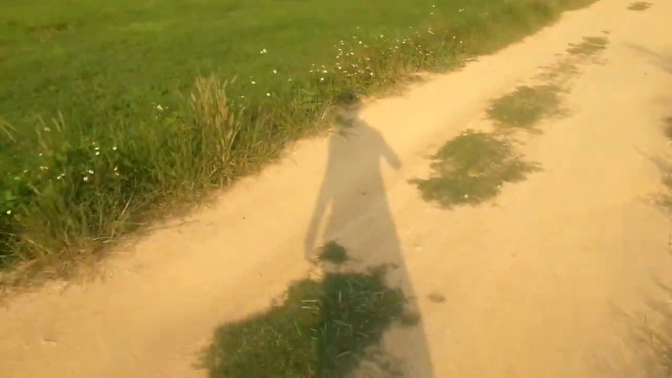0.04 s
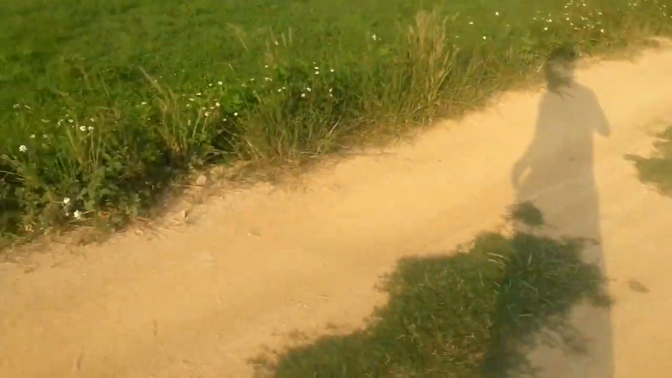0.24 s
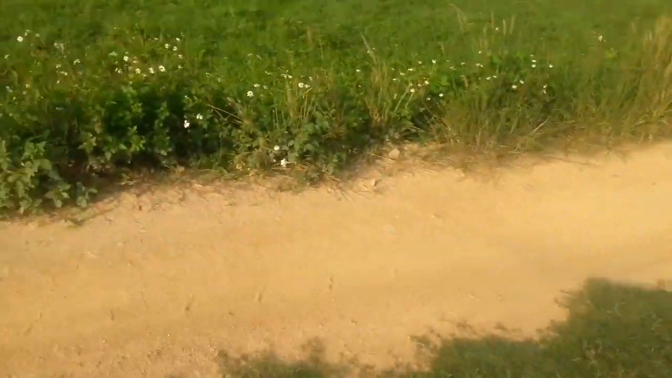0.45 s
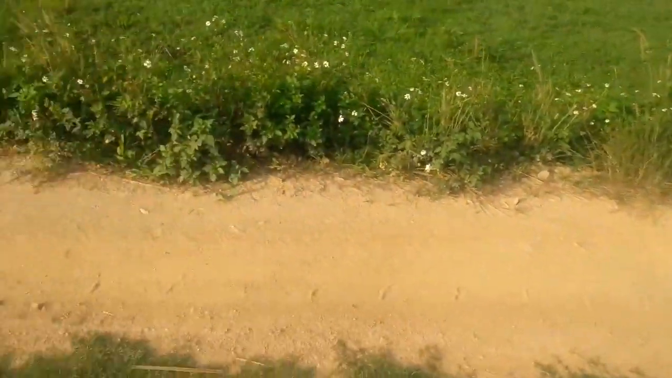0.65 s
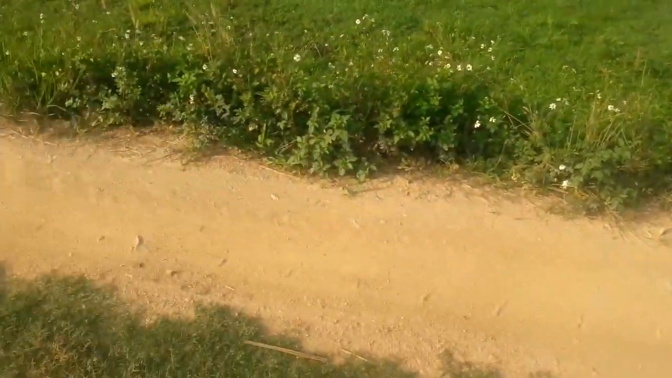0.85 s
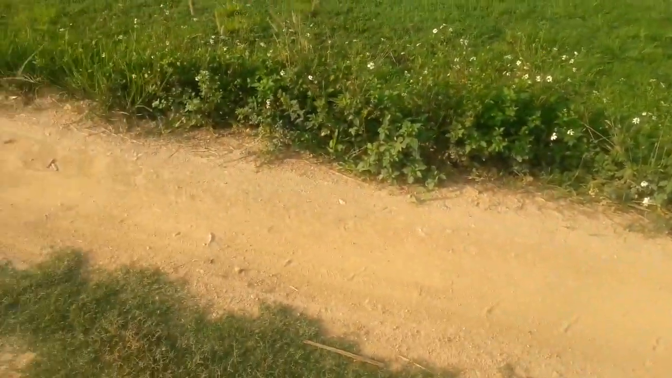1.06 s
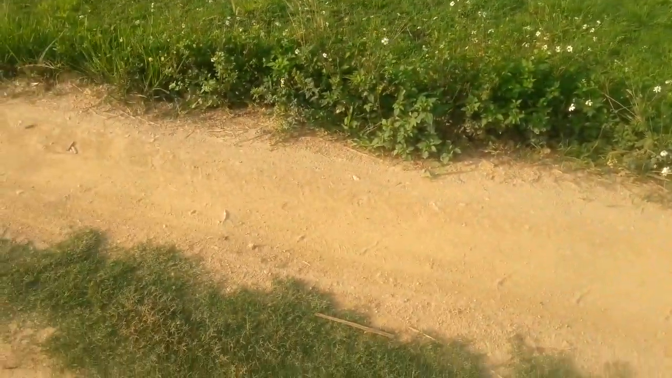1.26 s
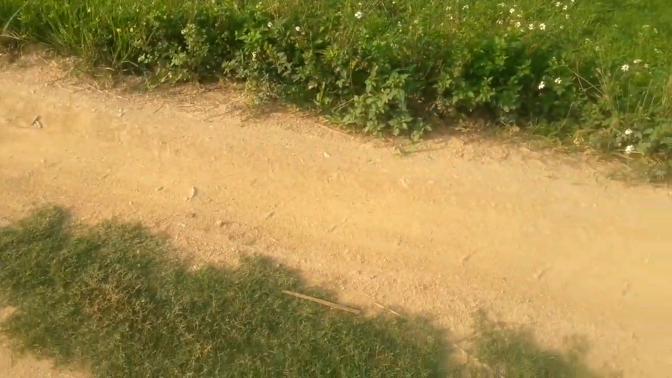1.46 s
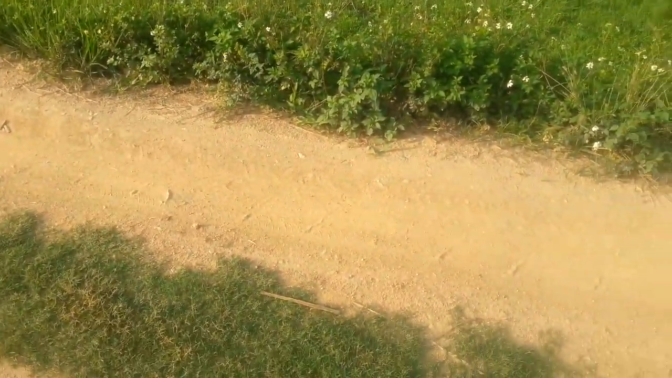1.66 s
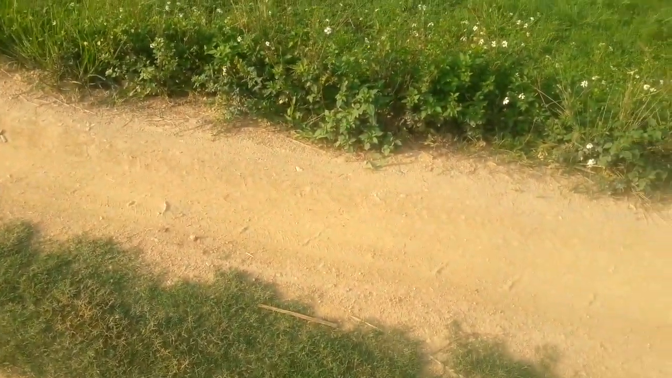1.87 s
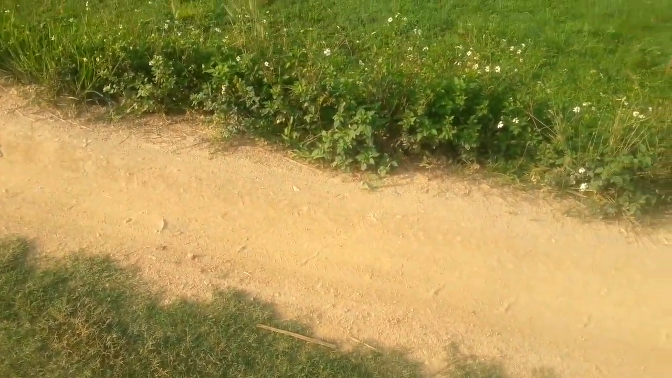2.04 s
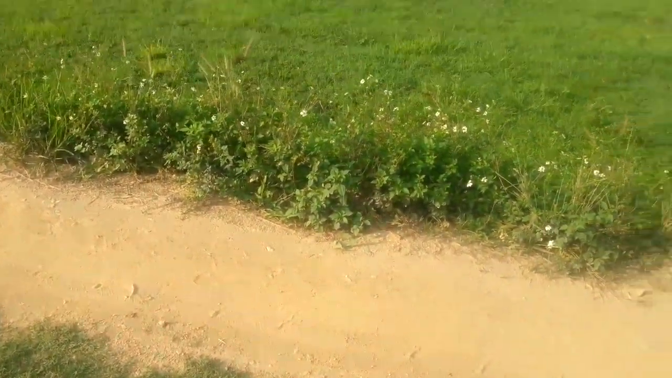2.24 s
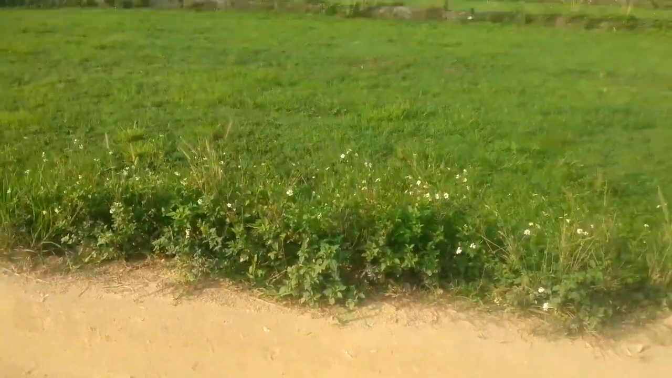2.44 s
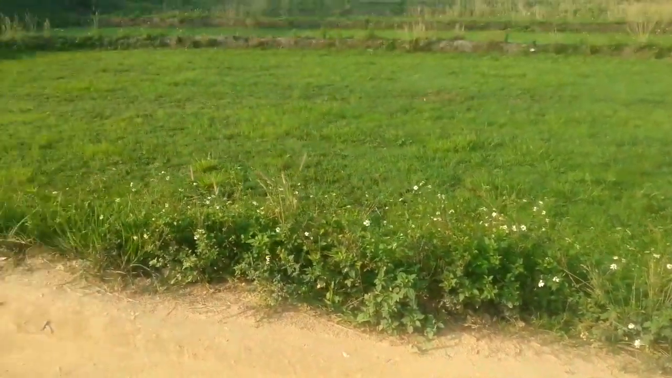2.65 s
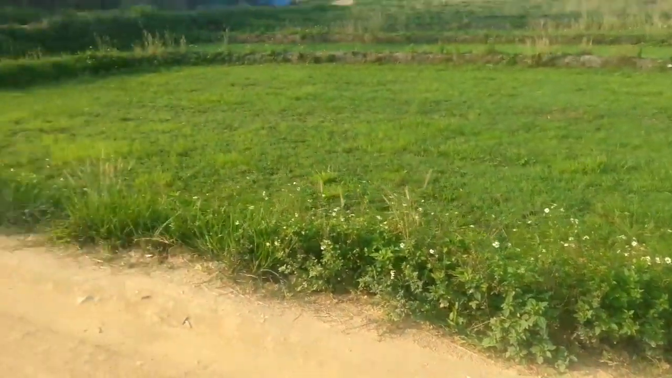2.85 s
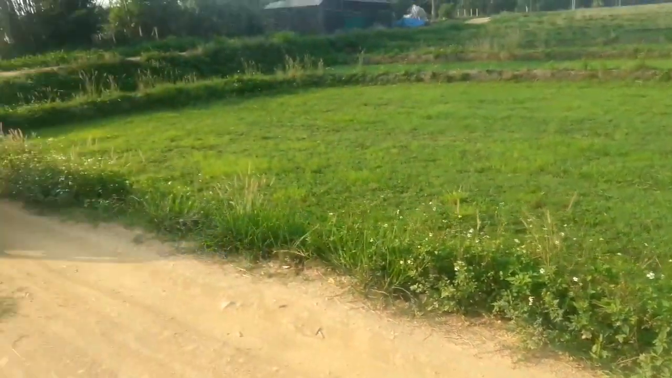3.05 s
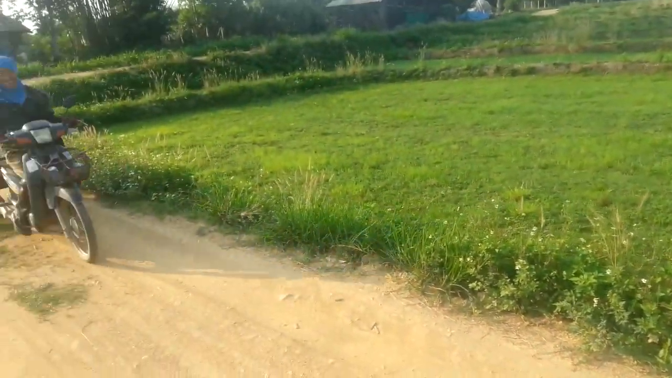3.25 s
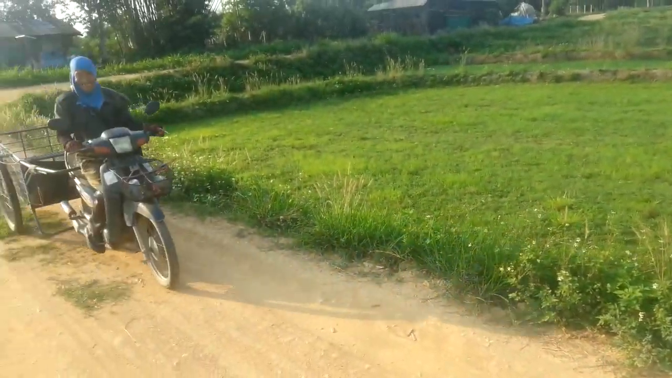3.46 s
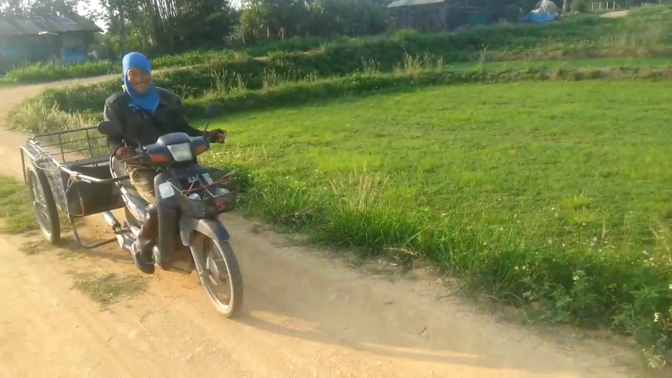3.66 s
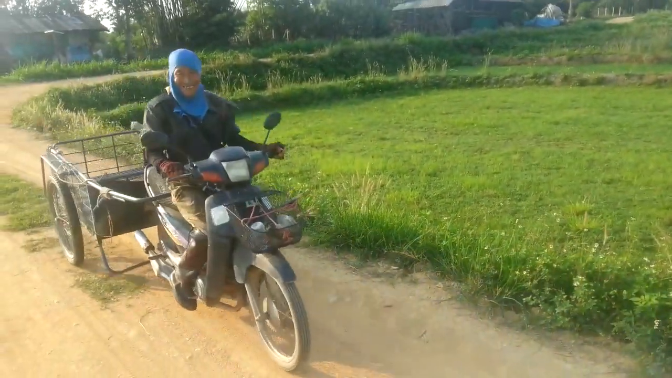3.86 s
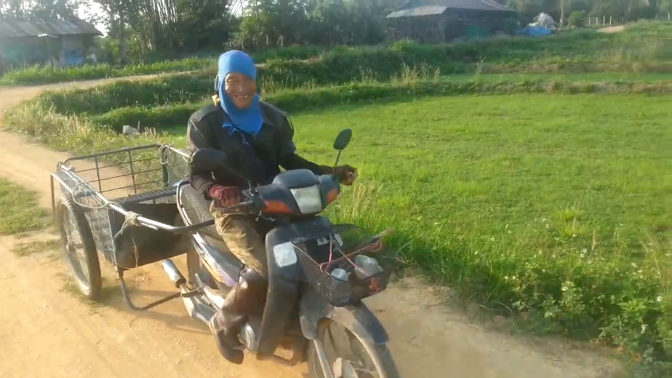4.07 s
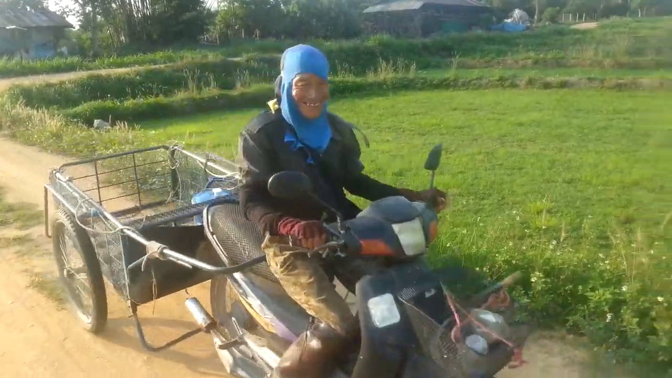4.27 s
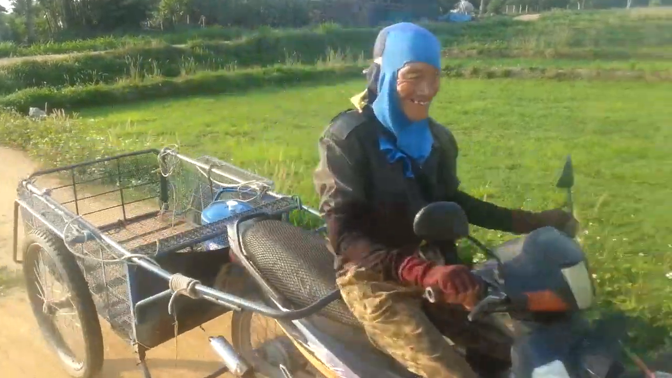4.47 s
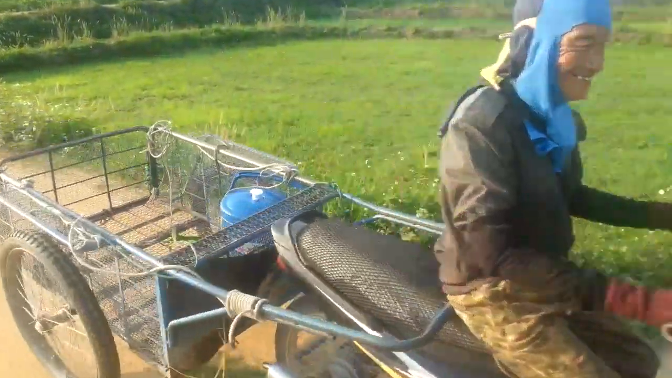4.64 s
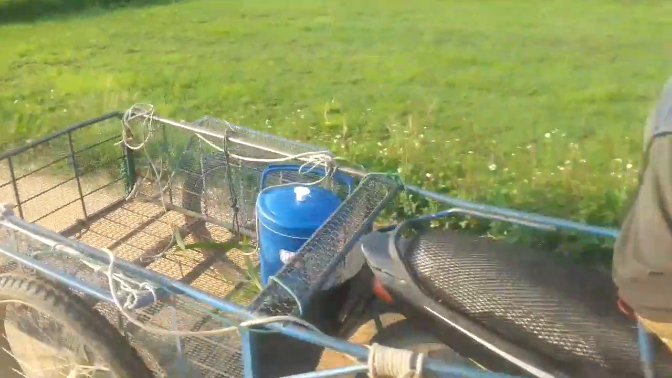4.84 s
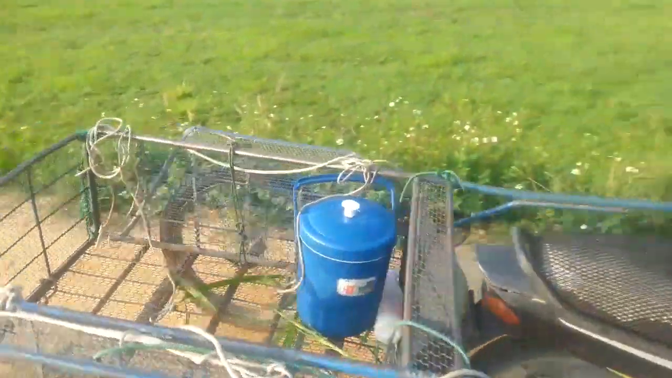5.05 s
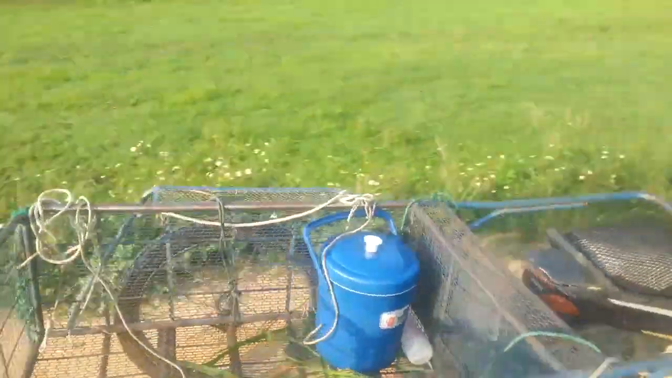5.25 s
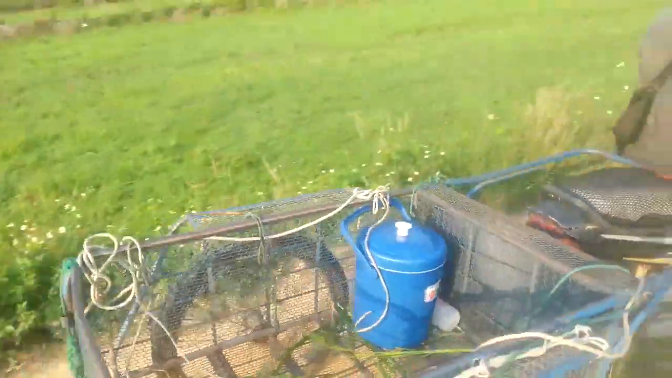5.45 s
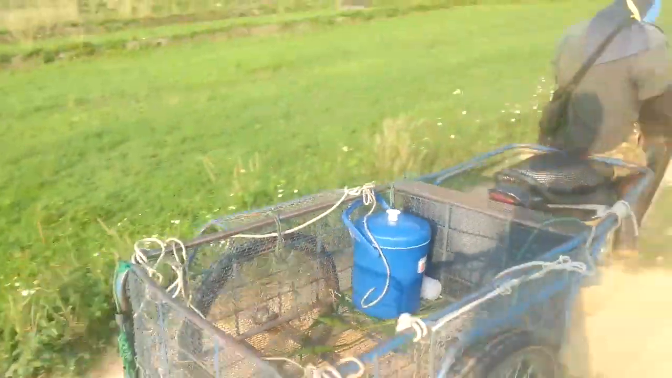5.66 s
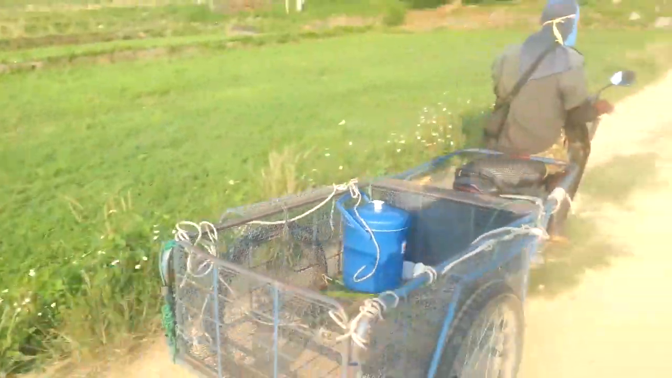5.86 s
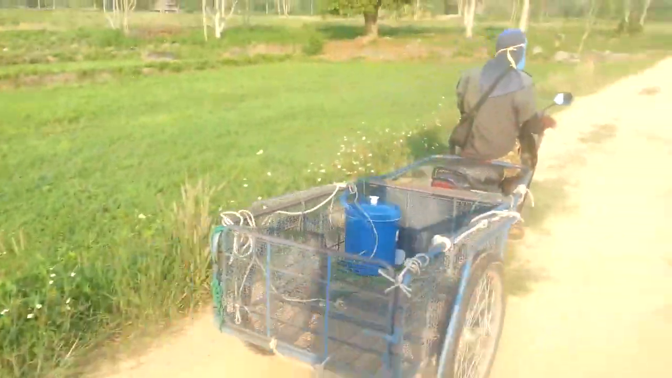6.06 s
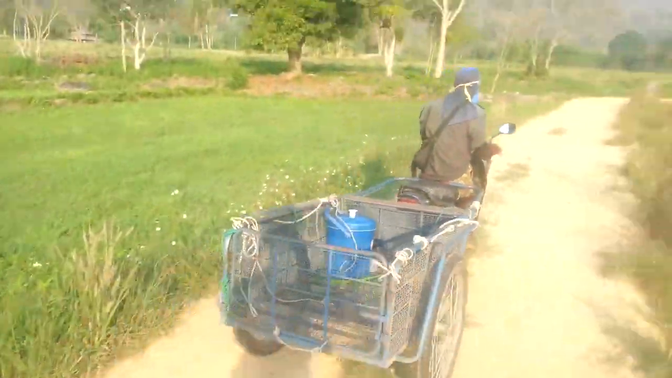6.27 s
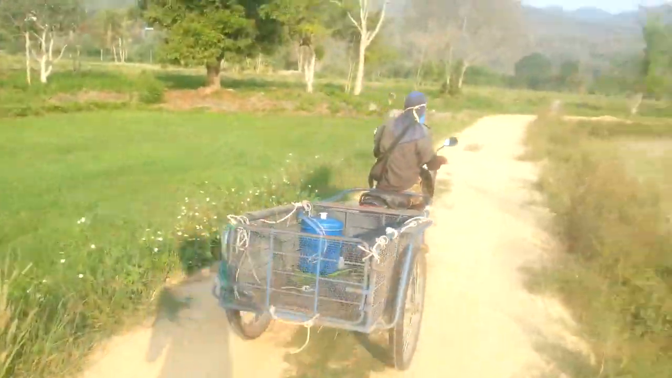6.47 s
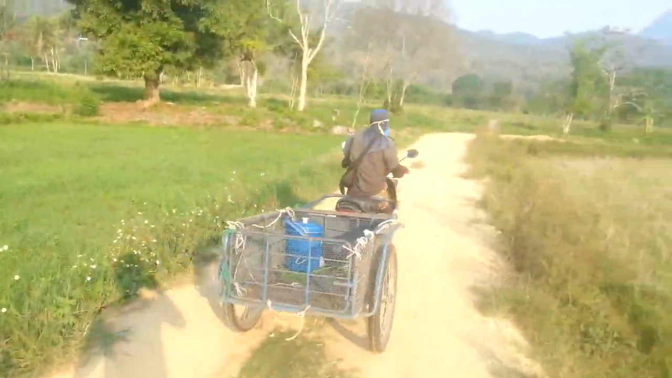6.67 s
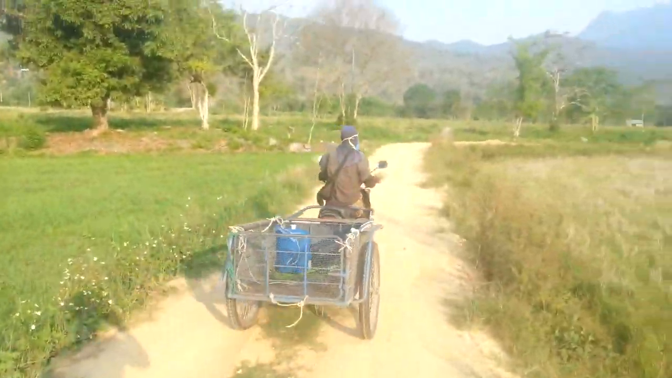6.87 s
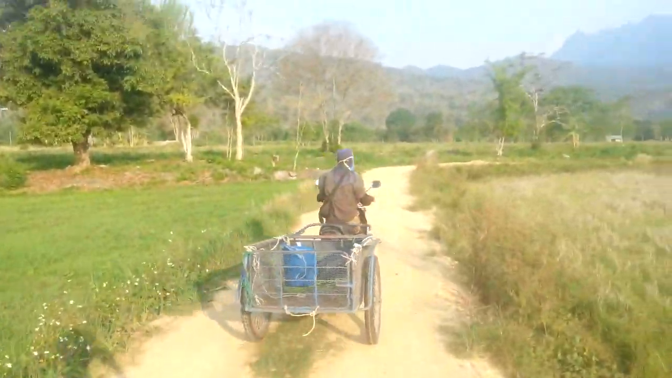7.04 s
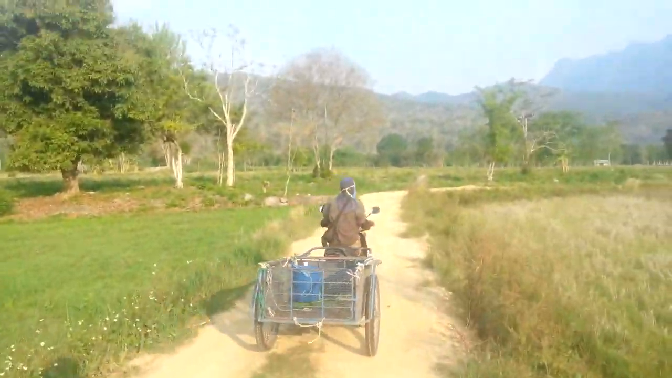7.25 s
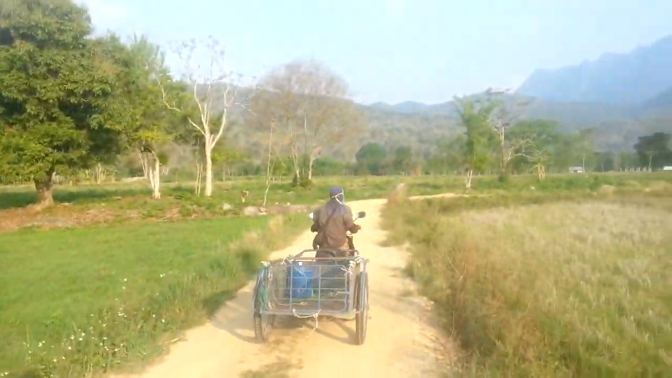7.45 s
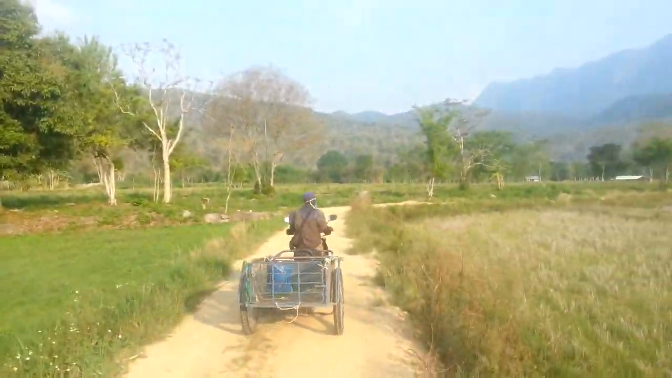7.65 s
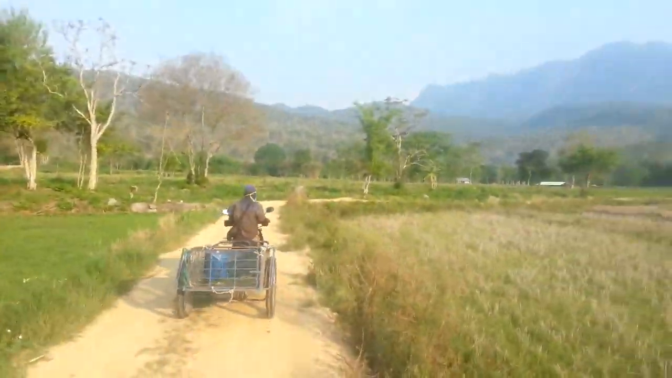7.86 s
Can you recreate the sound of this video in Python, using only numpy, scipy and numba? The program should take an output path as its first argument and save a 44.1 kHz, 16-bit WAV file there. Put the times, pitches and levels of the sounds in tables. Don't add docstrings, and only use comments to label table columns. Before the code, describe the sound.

A phone held beside a rural track picks up a faint, stuttering motorbike and a few soft foot scuffs over grassy hiss. The bike opens its throttle and comes close, sharp dry exhaust cracks over hollow pipe puffs. Its empty wire cart follows with hard metallic jolts, loose rattling and crunching tyres. Then the engine, slightly faster, moves off, still popping, with scattered cart bangs. Little bass, open air, no echo.

```python
import sys
import numpy as np
from scipy import signal
from scipy.fft import rfft, irfft
from scipy.io import wavfile
from scipy.ndimage import uniform_filter1d
from numba import njit

SR = 44100
rng = np.random.default_rng(int(sys.argv[2]) if len(sys.argv) > 2 else 0)


def store_wav(level_fs):
    pcm = np.round(np.clip(np.atleast_2d(level_fs), -1, 1) * 32767)
    wavfile.write(sys.argv[1], SR, pcm.T.astype(np.int16))


def gain_from_decibels(decibels):
    exponent = np.asarray(decibels, float) / 20
    return 10 ** exponent


N = 348831

# t/s, crank rate/(turns per s), lag of the left port/samples
RIDE = [
    (0, 33.5, -17),
    (2.3, 33, -19),
    (2.65, 36.5, -17),
    (3.4, 38.5, -8),
    (4.3, 40.2, -2),
    (5.4, 39.5, 6),
    (6.2, 42, 4),
    (7.91, 42.5, 2),
]
# t/s, level/dB
ROLL = [(0.0, -49.5), (1.5, -46.5), (2.46, -40.5), (3.33, -33.5), (3.96, -28.5), (4.49, -26), (5.07, -30),
        (5.42, -23.5), (5.66, -31), (6.14, -28.5), (6.39, -32), (6.87, -34), (7.23, -38), (7.56, -36.5),
        (7.91, -28)]
# t/s, then pitch ratios of
SHIFT = [
    (0, 1.09, 1.03, 1.09, 1.095),
    (2.0, 1.07, 1.01, 1.11, 1),
    (2.7, 1.184, 0.86, 0.767, 1.255),
    (3.3, 1.035, 0.89, 1.06, 1.08),
    (4.4, 0.95, 0.92, 1.01, 0.85),
    (4.9, 1.013, 0.88, 1.07, 1.544),
    (5.5, 0.97, 0.94, 1.048, 0.99),
    (6.2, 1.06, 1.11, 0.94, 0.94),
    (6.6, 1.03, 1.01, 1.01, 0.89),
    (7.91, 1.094, 1.05, 1.034, 1.03),
]


def level(x):
    return x / np.sqrt(np.mean(x ** 2))


def curves(table):
    s, *columns = np.transpose(table)
    return [np.interp(np.arange(N) / SR, s, c) for c in columns]


def passed(x, hz, kind, order=2):
    return signal.sosfilt(signal.butter(order, hz, kind, fs=SR, output="sos"), x)


def spread(x, shape):
    return signal.oaconvolve(x, shape[None], axes=1)[:, :N]


def colour(x, points):
    hz, db = np.transpose(points)
    grid = np.fft.rfftfreq(2048, 1 / SR) + 1
    cepstrum = irfft(np.log(gain_from_decibels(np.interp(np.log(grid), np.log(hz), db))))
    cepstrum[1:1024] *= 2
    impulse = irfft(np.exp(rfft(cepstrum[:1024], 2048)))
    return spread(x, impulse[:768])


@njit
def resonate(x, modes, ratio):
    out = np.zeros(x.shape)
    for hz, gain, t60 in modes:
        r = np.exp(-np.log(1000) / (t60 * SR))
        for c in range(2):
            re, im, cos, sin = 0., 0., 0., 0.
            for i in range(x.shape[1]):
                if i % 32 == 0:
                    w = 2 * np.pi * hz * ratio[i] / SR
                    cos, sin = r * np.cos(w), r * np.sin(w)
                re, im = re * cos - im * sin + x[c, i] + 1e-18, re * sin + im * cos
                out[c, i] += gain * im
    return out


def ring(x, modes, ratio=np.ones(N)):
    hz, db, t60 = np.transpose(modes)
    return resonate(np.ascontiguousarray(x), np.transpose([hz, gain_from_decibels(db), t60]).copy(), ratio)


def taps(s, size, bend=1):
    ride = np.transpose(RIDE)
    lag = bend * np.interp(s, ride[0], ride[2]) / 2
    at = np.clip(np.round(s * SR + np.array([lag, -lag])).astype(int), 0, N - 1)
    return np.array([np.bincount(k, size, N) for k in at])


def fade(t60, rise=.0005):
    t = np.arange(int(t60 * SR) + 2) / SR
    return (1 - np.exp(-t / rise)) * np.exp(-np.log(1000) * t / t60)


def push(span):
    shape = np.hanning(int(span * SR) + 3)
    return shape / shape.sum()


def noise(alike):
    common, left, right = rng.standard_normal((3, N))
    at = np.clip(np.arange(N) - curves(RIDE)[1].astype(int), 0, N - 1)
    common = np.array([common[at], common])
    alike = np.clip(alike, 0, 1)
    treble = np.sqrt(alike) * common + np.sqrt(1 - alike) * np.array([left, right])
    return common + passed(treble - common, 1010, "high")


def grains(per_s, scatter_db):
    hit = rng.random(N) < per_s / SR
    size = gain_from_decibels(scatter_db * np.minimum(rng.exponential(size=N), 4))
    return level(spread((hit * size)[None], fade(0.022, rise=0.000069)))


def breeze():
    common, *own = rng.standard_normal((3, N))
    rumble = level(passed(common + 0.57 * np.array(own), 200, "low"))
    return gain_from_decibels(0.53 * curves(ROLL)[0] - 35) * rumble


def field():
    # f/Hz, gain/dB
    air = [(12, -55), (20, -42), (66, -62), (115, -52), (347, 9), (603, -2.5), (733, 4.5), (1140, -26.5),
           (4560, -13.5), (11100, -19), (15000, -27)]
    drift = uniform_filter1d(uniform_filter1d(rng.standard_normal(N), 5000), 5000)
    return gain_from_decibels(-39 + 0.5 * level(drift)) * level(colour(noise(0.43), air))


def foot():
    # t/s, level/dB, half length/s, centre f/Hz
    scuffs = [
        (0.117, -45, .04, 3700),
        (0.216, -48, 0.026, 2830),
        (0.36, -44, 0.036, 4580),
        (0.589, -28, 0.0029, 1310),
        (.798, -22, 0.013, 1270),
        (1.344, -49, 0.0027, 2020),
    ]
    t, out = np.arange(N) / SR, np.zeros((2, N))
    grit = (.5 + grains(900, scatter_db=2.5)) * noise(.4)
    for s, db, span, hz in scuffs:
        near = abs(t - s) < .1
        swell = np.exp(-((t[near] - s) / span) ** 4)
        band = passed(grit[:, near], [hz * 0.88, hz * 1.115], "band", order=1)
        out[:, near] += gain_from_decibels(db) * swell * level(band)
    return out


def bounced(x):
    speed_m_s, passes_s, nearest_m = 2.64, 4.943, 1.37
    axle_m, phone_m, ground_db = 0.426, 1.336, -14.5
    away = np.hypot(speed_m_s * (np.arange(N) / SR - passes_s), nearest_m)
    detour = np.hypot(away, phone_m + axle_m) - np.hypot(away, phone_m - axle_m)
    at = np.arange(N) - detour / 343 * SR
    return x + gain_from_decibels(ground_db) * np.array([np.interp(at, np.arange(N), v) for v in x])


def cart(crunch_db, chatter_db):
    # t/s, peak level/dB, length/s
    jolts = [(1.793, -18.5, 0.033), (2.83, -20, 0.057), (3.39, -22, 0.11), (3.653, -12, 0.018),
             (3.8257, -12.5, 0.041), (3.92, -15.5, 0.14), (4.091, -17, 0.062), (4.463, -7, 0.061),
             (4.581, -1, 0.03), (4.66, -20, 0.12), (4.715, -16, 0.04), (4.798, -14, 0.048),
             (4.853, -1.5, 0.046), (4.887, -15.5, 0.21), (5.211, -8.5, 0.031), (5.265, -6, 0.039),
             (5.362, -17, 0.21), (5.416, -8.5, 0.054), (5.51, -27.5, 0.086), (5.9354, -5, 0.076),
             (6.0824, -2.5, 0.058), (6.186, -11, 0.091), (6.322, -8.5, 0.047), (6.477, -5.5, 0.044),
             (6.564, -12.5, 0.07), (6.627, -5.5, 0.058), (6.918, -15, 0.043), (7.55, -18, 0.037),
             (7.683, -8.5, 0.049), (7.859, -5, 0.027)]
    # f/Hz, gain/dB, t60/s
    mesh_modes = [(660, -30.5, 0.029), (1038, -9, 0.051), (1479, -0.5, 0.033), (1855, -1.5, 0.055),
                  (2470, 6.5, 0.03), (4160, -60, 0.02), (4870, -50, 0.031), (6660, -6.5, 0.019),
                  (7200, -32, 0.06), (7250, -13, 0.05), (9360, -2.5, 0.0065)]
    # f/Hz, gain/dB
    clatter = [(500, -49.5), (1500, 2), (3000, 3.5), (5000, 2.5), (8000, -2.5), (11000, -13), (13000, -30),
               (15000, -33)]
    crunch = [(150, 3.5), (500, -2), (1000, 3.5), (1800, 0.5), (2800, -12), (3500, -14), (6000, -29)]
    shake, t = gain_from_decibels(chatter_db - 5.5), np.arange(SR // 4) / SR
    for s, db, span in jolts:
        after = shake[int(s * SR):][:len(t)]
        after += (gain_from_decibels(db - 13) * np.exp(-(t / span) ** 2))[:len(after)]
    knocks = shake * grains(1400, scatter_db=3.5) * noise(0.1)
    mesh = colour(knocks, clatter) + gain_from_decibels(-31.5) * ring(knocks, mesh_modes)
    grit = grains(800, scatter_db=4.5) * noise(0.65)
    tyres = gain_from_decibels(crunch_db + 3.0) * level(colour(grit, crunch))
    return mesh + bounced(tyres)


def crank():
    # t/s, firings in a row/1, idle
    # turns after/1, crack peak level/dB
    stutters = [(0.0401, 1, 2, -33), (0.1325, 1, 3, -21), (0.4805, 1, 4, -35), (0.6289, 1, 3, -25.5),
                (0.8347, 1, 2, -31), (0.9234, 1, 3, -24), (1.2418, 1, 2, -24.5), (1.3066, 1, 2, -19.5),
                (1.3914, 1, 3, -16.5), (1.7197, 1, 2, -14.5), (1.8144, 1, 2, -21), (1.8447, 1, 2, -13.5),
                (2.0255, 1, 2, -24.5), (2.1486, 1, 2, -13.5), (2.3052, 2, 1, -14.5), (2.3956, 1, 2, -9.5),
                (2.698, 2, 2, -16), (2.8067, 1, 1, -11.5), (2.9156, 2, 1, -12.5), (3.0775, 1, 2, -10),
                (3.4182, 1, 2, -7.5), (3.5216, 1, 2, -2.5), (3.8534, 1, 2, 2), (3.9513, 1, 2, 0),
                (4.1272, 1, 2, 2), (4.3023, 1, 2, 2), (4.4026, 1, 2, -2), (4.647, 1, 2, -2.5),
                (4.8237, 1, 1, -4.5), (4.9489, 2, 1, 1.5), (5.0245, 1, 1, -2), (5.0981, 1, 2, -2),
             (5.2015, 1, 2, 2), (5.4003, 3, 2, -2), (5.53, 1, 1, 0.5), (5.5818, 2, 1, 0),
             (5.76, 1, 2, -3.5), (5.8604, 1, 2, -1.5), (6.0328, 1, 1, -3.5), (6.1045, 1, 2, -2),
             (6.2009, 1, 1, -4.5), (6.275, 2, 1, -1), (6.4372, 1, 2, -3), (6.561, 1, 2, -3.5),
             (6.7032, 2, 1, -4.5), (7.0618, 2, 1, -4.5), (7.4197, 1, 1, -6), (7.4682, 2, 1, -4),
             (7.6124, 4, 1, -5), (7.732, 2, 1, -4.5)]
    s, firings, idles, crack_db = np.transpose(stutters)

    def rate(t):
        return np.interp(t, *np.transpose(RIDE)[:2])

    turn = np.r_[0, np.cumsum(np.round(np.diff(s) * rate((s[1:] + s[:-1]) / 2)))]
    every = np.arange(-1, turn[-1] + 8)
    known_turn = np.r_[-2, turn, turn[-1] + 8]
    known_s = np.r_[s[0] - 2 / rate(0), s, s[-1] + 8 / rate(8)]
    even = signal.savgol_filter(np.interp(every, known_turn, known_s), 21, 3)
    row = np.clip(np.searchsorted(turn, every, "right") - 1, 0, None)
    fired = (every - turn[row]) % np.round(firings + idles)[row] < np.round(firings)[row]
    index = np.arange(len(every))
    before = index - np.maximum.accumulate(np.where(fired, 0, index)) - 1
    return even[fired], even[~fired], crack_db[row][fired], before[fired]


def shell(panel_db, cap_db, pan_db, outlet_db):
    # f/Hz, gain/dB, t60/s
    shell_modes = [(948, -10.5, 0.048), (1510, -8, 0.019), (2705, -9.5, 0.057), (2868, -1.5, 0.04),
                   (3280, -12, 0.018), (4130, -11.5, 0.03), (5550, -8.5, 0.015)]
    panel_modes = [(2446, -4.5, 0.021), (2570, -24.5, 0.12)]
    cap_modes = [(4772, -9, 0.019), (4980, -9, 0.0039)]
    shock_modes = [(2776, 0, 0.0045)]
    # f/Hz, gain/dB
    spit_colour = [(800, -22), (2000, 21), (5000, 7), (9000, 12.5), (13000, 7), (16000, -9)]
    s, idle, fresh_db, before = crank()
    rested = np.clip(np.diff(np.searchsorted(idle, s), prepend=0), 1, 2)
    chance = rng.standard_normal((len(s), 5)).T
    crack_db = fresh_db - 4.5 * before + 1.3 * chance[3]
    spit_db = fresh_db - 12 + outlet_db[(s * SR).astype(int)]
    spit_db = spit_db - 19.5 * before + 1 * (rested - 2) + 2 * chance[4]
    latest = np.clip(np.searchsorted(s - .003, np.arange(N) / SR) - 1, 0, None)
    ratio = curves(SHIFT)[2] * (1 + .015 * chance[0, latest])
    panel = gain_from_decibels(panel_db + 1.5 * chance[1, latest])
    cap = gain_from_decibels(cap_db - 3 + 2 * chance[2, latest])
    blows = taps(s - .0006, gain_from_decibels(crack_db))
    shock = blows
    for _ in range(3):
        shock = ring(shock, shock_modes, ratio)
    rough = gain_from_decibels(-23) * blows + gain_from_decibels(-35) * spread(blows, fade(0.05, rise=0.0006)) * noise(0.5)
    rings = ring(rough, shell_modes) + ring(rough * panel, panel_modes) + ring(rough * cap, cap_modes)
    spit = spread(taps(s - .0003, gain_from_decibels(spit_db + 0.5)), fade(0.022, rise=0.0041)) * noise(0.043)
    shade = gain_from_decibels((pan_db + 17) * np.array([[.5], [-.5]]))
    return shade * (gain_from_decibels(-43.5) * shock + rings) + colour(spit, spit_colour)


def exhaust(puff_db, fire_db, upper_db, header_db, drum_db):
    # f/Hz, gain/dB, t60/s
    pipe_modes = [(312.3, 1, 0.086), (352.4, -1, 0.08)]
    upper_modes = [(466.2, 0.93, 0.068), (515.4, 0.92, 0.029)]
    header_modes = [(707.6, 0, 0.038)]
    drum_modes = [(179, -2.5, 0.048), (146.7, 0.95, 0.053)]
    # f/Hz, gain/dB, t60/s
    chamber_modes = [(320, -38, .03)]
    s, idle, _, before = crank()
    thump_db = (puff_db + fire_db)[(s * SR).astype(int)] - 3.5 * before
    thump_db = thump_db + .8 * rng.standard_normal(len(s))
    pipe_ratio, header_ratio, _, chamber_ratio = curves(SHIFT)
    left_db = np.r_[np.zeros(len(idle)), np.full(np.sum(before > 0), -2)]
    idle = np.r_[idle, s[before > 0]]
    chance = rng.standard_normal((len(idle), 2)).T
    idle_db = puff_db[np.clip(idle * SR, 0, N - 1).astype(int)] + left_db + .8 * chance[0]
    hard = taps(s - .0026, gain_from_decibels(thump_db - 5.0), bend=0.91)
    soft = taps(idle + .001 + 0.00012 * chance[1], gain_from_decibels(idle_db + 7), bend=0.34)
    gas = gain_from_decibels(-36) * spread(hard + soft, fade(0.07, rise=0.0019)) * noise(1.0)
    slosh = ring(spread(soft, push(.0015)), chamber_modes, chamber_ratio)
    drive = gas - spread(hard, push(0.00071)) - slosh
    low = ring(drive, pipe_modes, pipe_ratio) - ring(drive * gain_from_decibels(drum_db), drum_modes)
    high = ring(drive * gain_from_decibels(header_db), header_modes, header_ratio) - ring(drive * gain_from_decibels(upper_db), upper_modes)
    return low + high


def scene():
    # t/s, puff level/dB, firing thump over puff/dB, then gains of
    # upper pipe/dB, header/dB, drum/dB
    heard = [(0.0, -35.5, 12.5, -8, -6, -11), (0.4, -34.5, 7, 3.5, 16.5, -7), (0.97, -29, 10.5, -1, 0, -12),
             (2.55, -28, 14.5, -5, -3, -13), (3.04, -25, 11.5, -5, -6, -11),
             (3.7, -23, 13.5, -7.5, -30, -19), (4.27, -25, 6, 0, -9, -6), (4.56, -28.5, 5.5, 11, 18.5, 2),
             (4.87, -21.5, 6.5, 8, 13.5, -5.5), (5.18, -30.5, 6.5, 15.5, 17, 9),
             (5.75, -28.5, 12.5, -10, 12, -3), (5.95, -22.5, 6, -15, 13, -3),
             (6.43, -25.5, 7.5, -0.5, 8, 2.5), (7.05, -26.5, 9.5, -1, 7, 4),
             (7.91, -29.5, 10.5, 1.5, 9, -2)]
    # t/s, low panel gain/dB, end cap gain/dB, left minus right/dB,
    # outlet gain/dB
    facing = [
        (0, 10, 11.5, -13, -12),
        (1.5, 4, 10, -13.5, -10),
        (2.2, 11.5, 15, -17.5, -4),
        (2.7, 17, 18, -18, 0),
        (3.3, 4, 22.5, -19.5, 3),
        (4.1, -48, 14, -15, -8.5),
        (4.6, 12.5, 14.5, -23.5, 0),
        (5.5, -6, 10, -16, -4),
        (6.5, 9.5, 6, -17.5, -1.5),
        (7.91, 2.5, -1, -20, -3),
    ]
    crunch_db = curves(ROLL)[0]
    motorcycle = exhaust(*curves(heard)) + shell(*curves(facing))
    far = motorcycle + cart(crunch_db, chatter_db=crunch_db + 3) + foot() + field()
    return passed(far, 205, "high", order=4) + breeze()


def roll_off(x):
    return signal.sosfilt(signal.butter(12, 15570, fs=SR, output="sos"), x)


def record(dry):
    # f/Hz, gain/dB
    right_port = [(60, 0.5), (250, -1.5), (600, -2), (1000, -1), (1600, 0.5), (2500, 7), (3200, 6.5),
                  (4200, 2.5), (6000, -3), (12000, -9)]
    ports = np.vstack([dry[:1], colour(dry[1:], right_port)])
    ports = passed(ports, 14000, "low", order=10)
    return roll_off(np.clip(ports, -1, 1))


dry = scene()
out = record(dry)
store_wav(out)
```